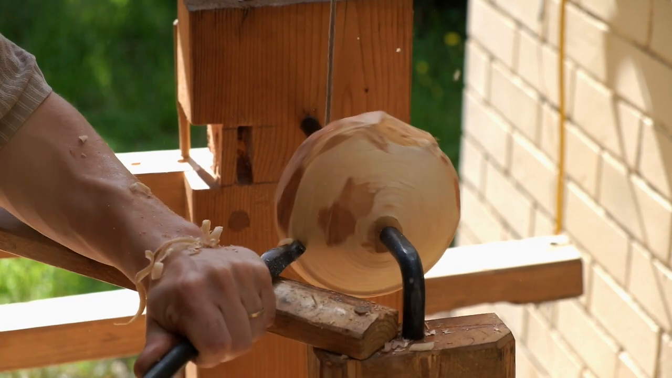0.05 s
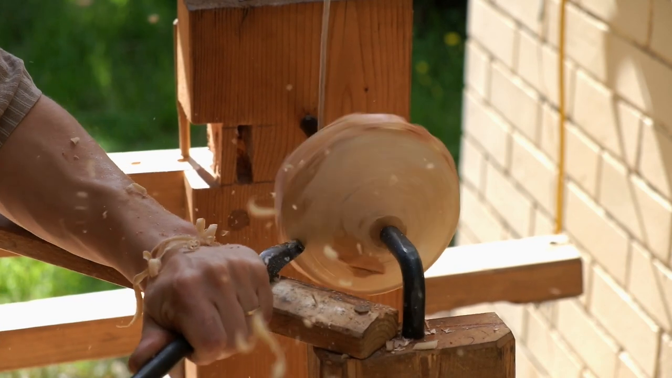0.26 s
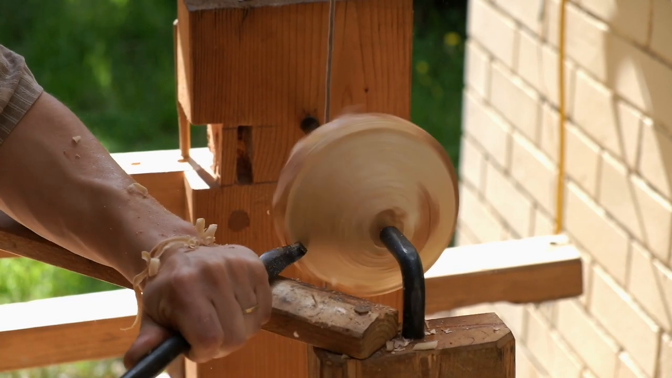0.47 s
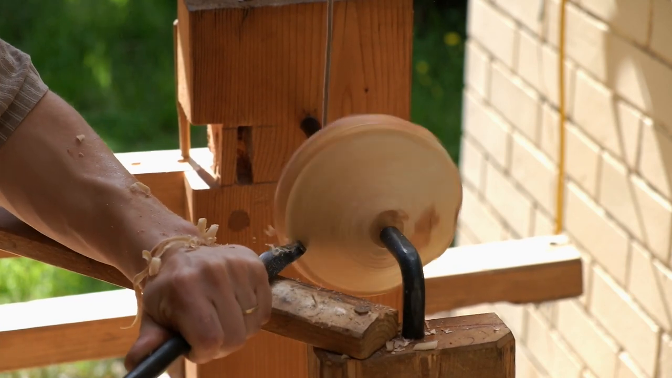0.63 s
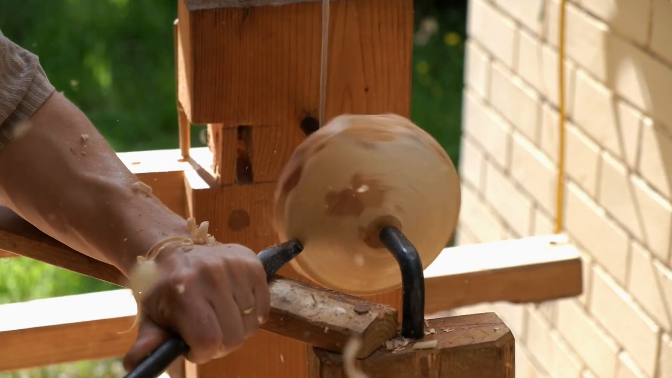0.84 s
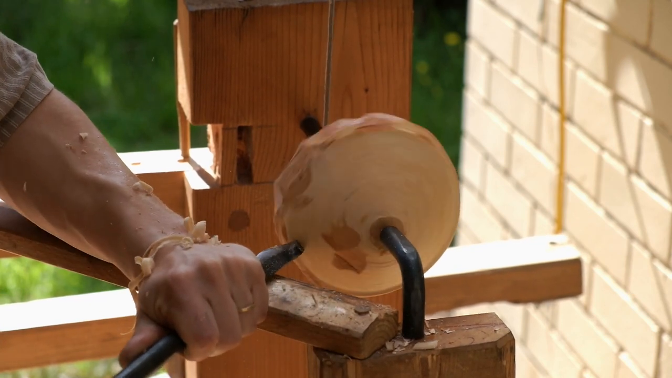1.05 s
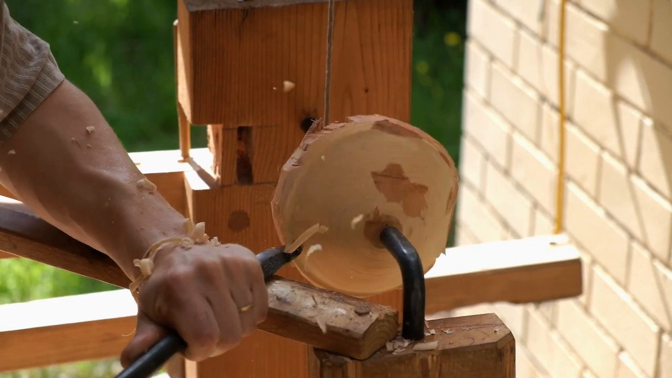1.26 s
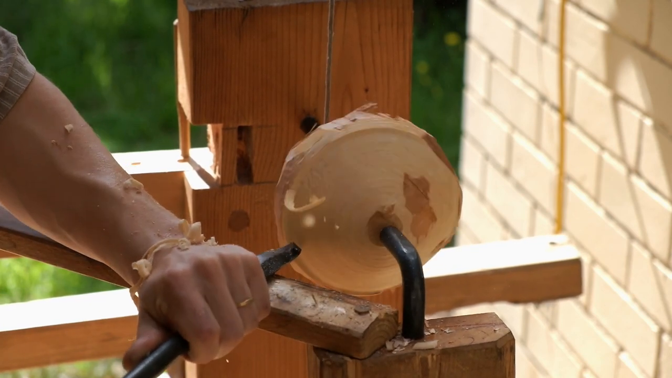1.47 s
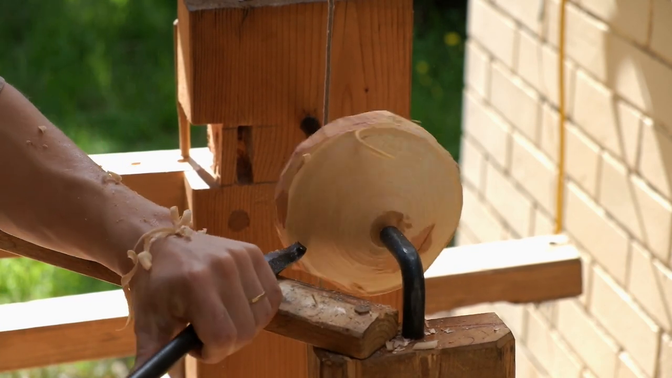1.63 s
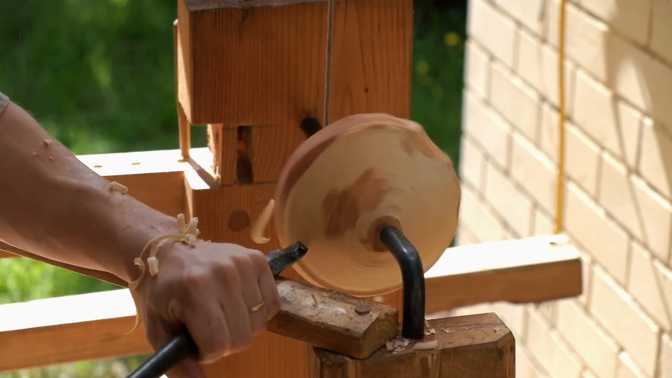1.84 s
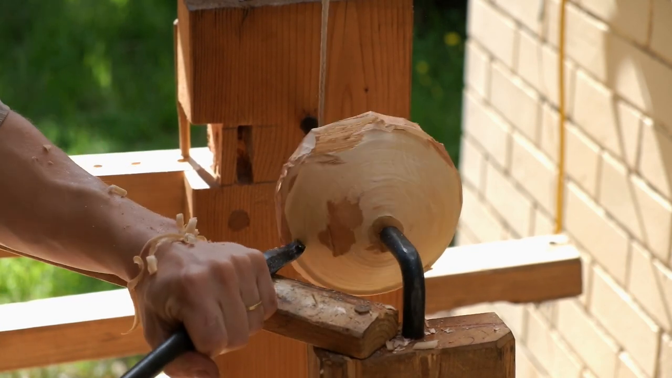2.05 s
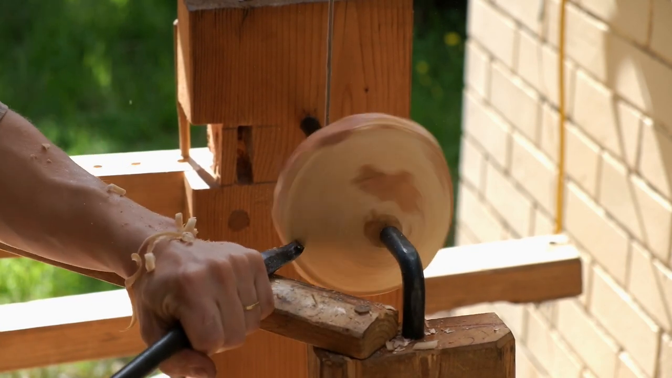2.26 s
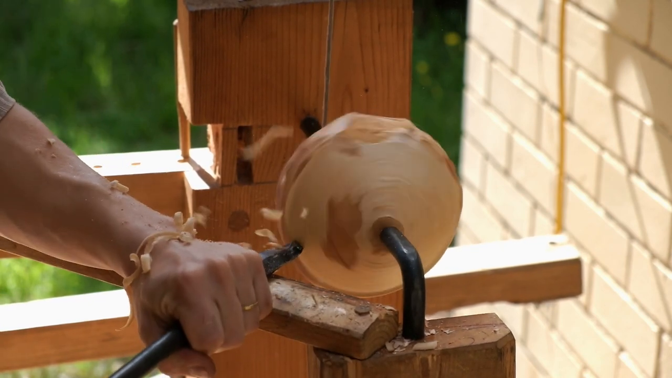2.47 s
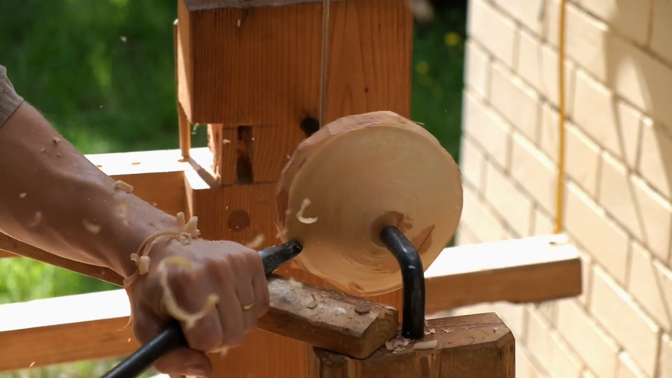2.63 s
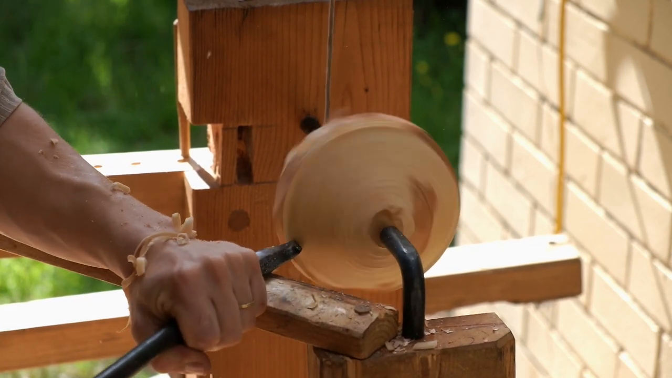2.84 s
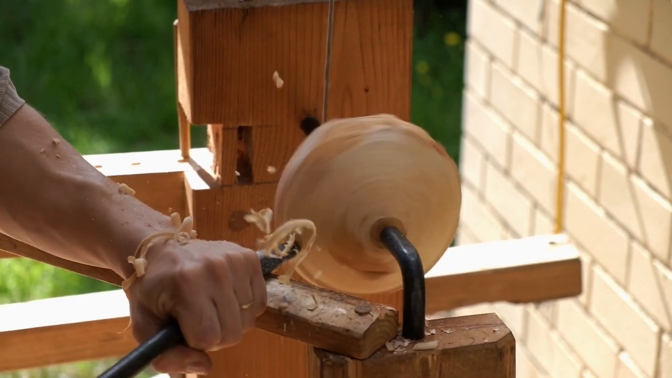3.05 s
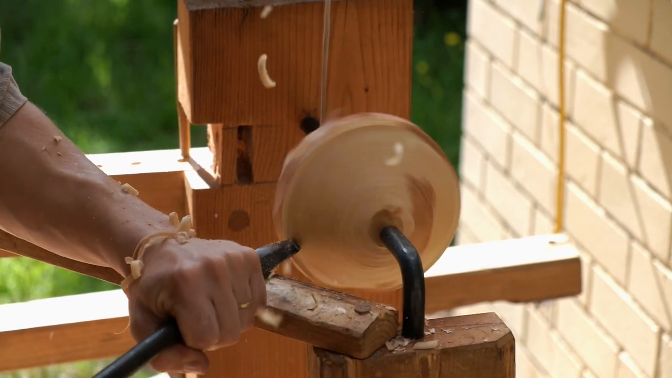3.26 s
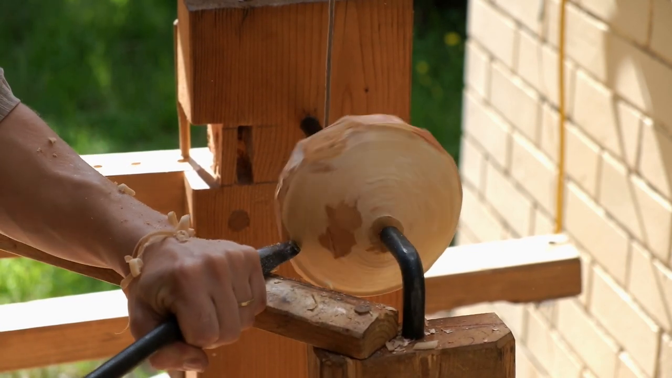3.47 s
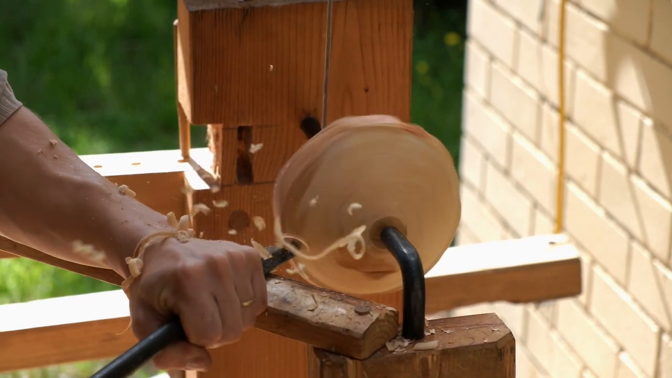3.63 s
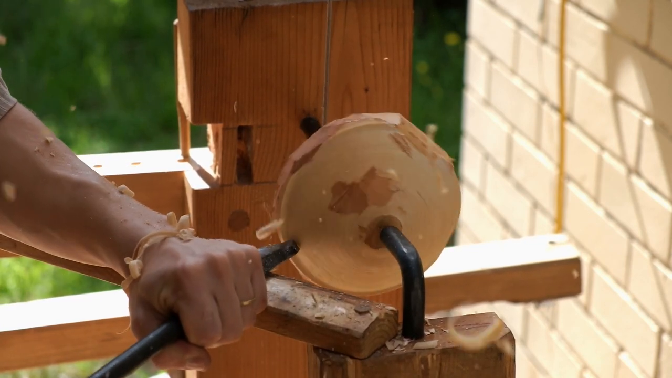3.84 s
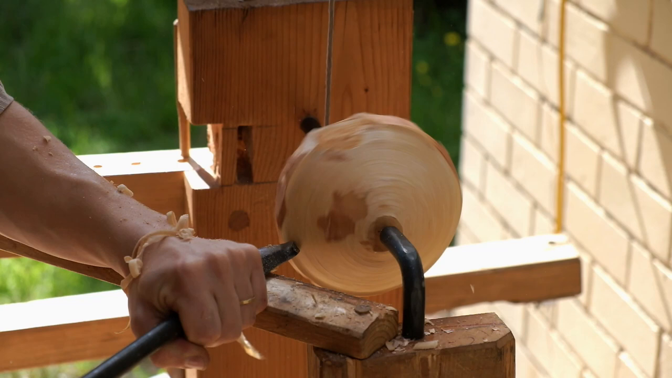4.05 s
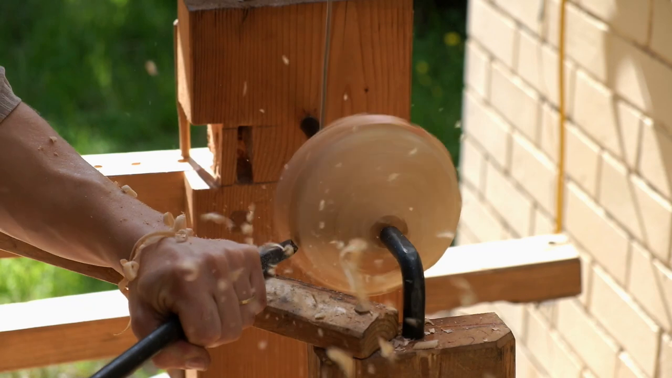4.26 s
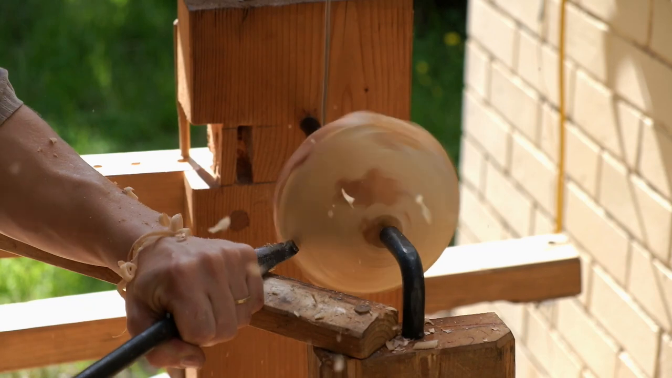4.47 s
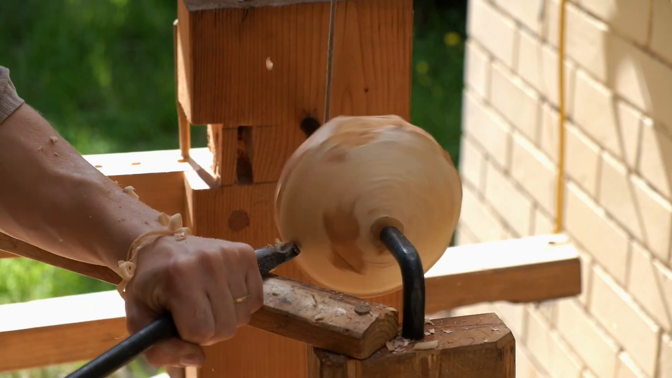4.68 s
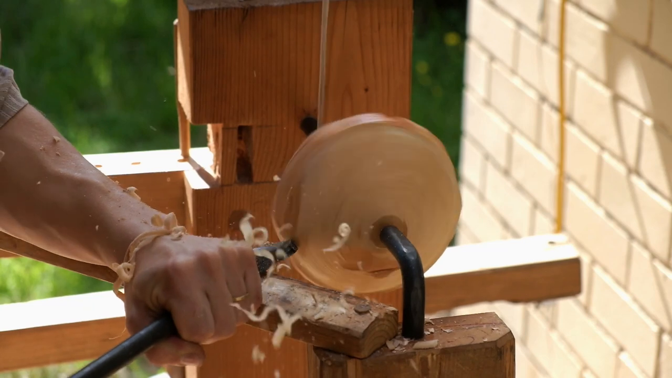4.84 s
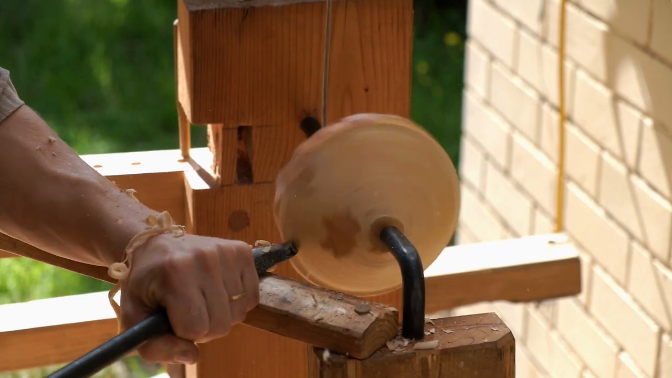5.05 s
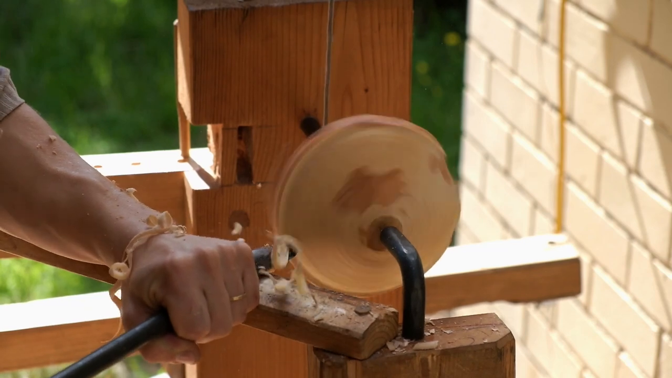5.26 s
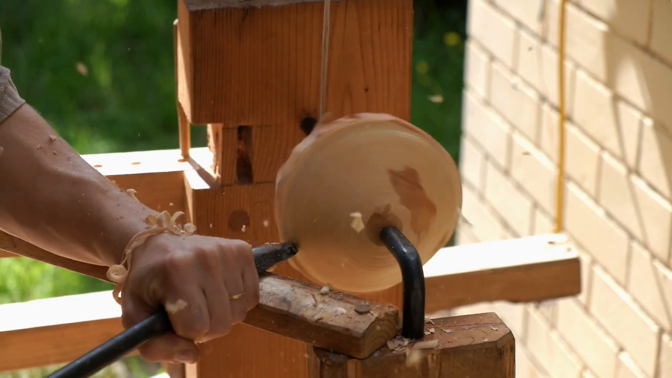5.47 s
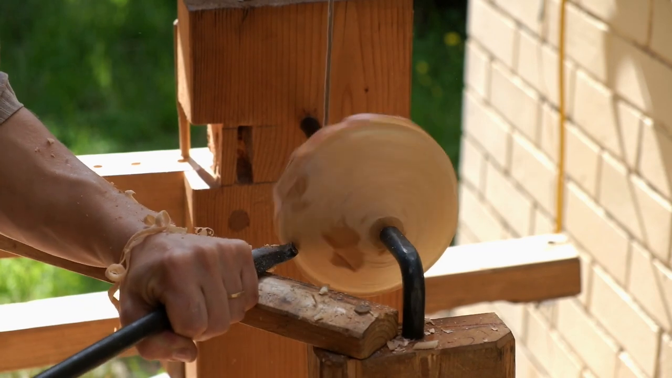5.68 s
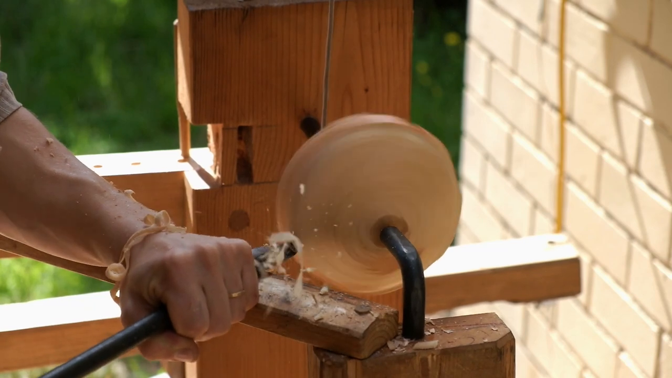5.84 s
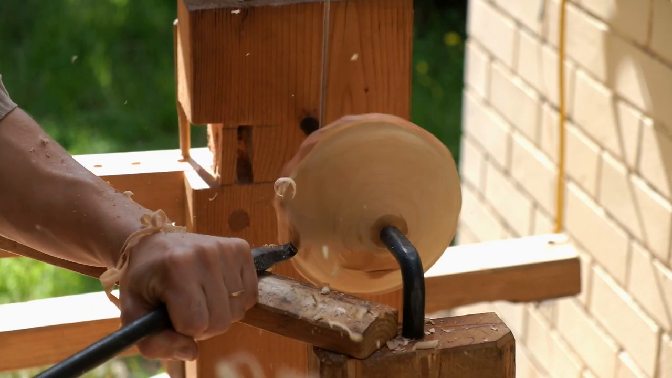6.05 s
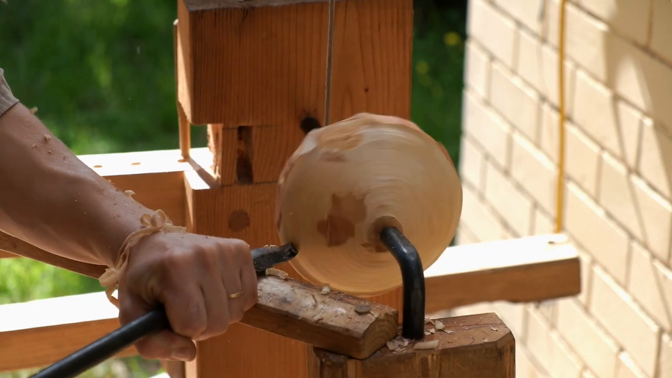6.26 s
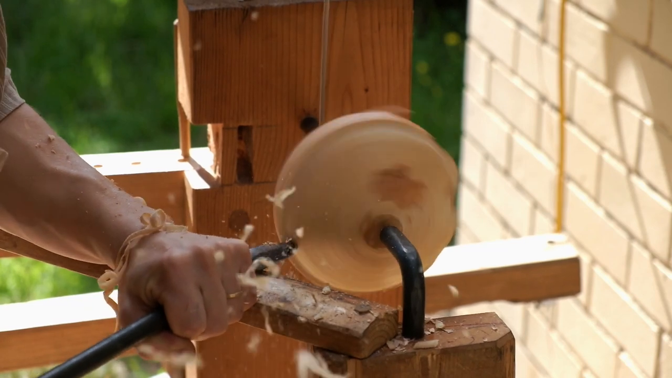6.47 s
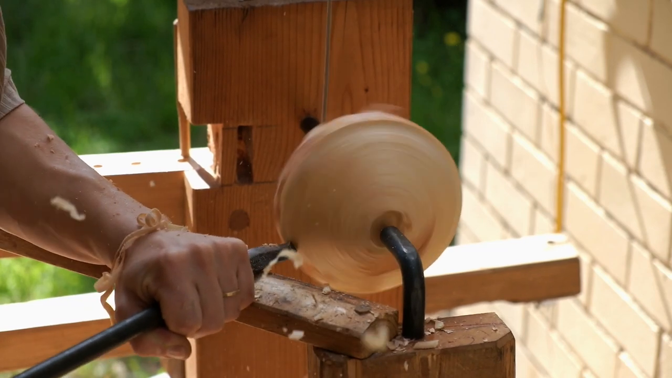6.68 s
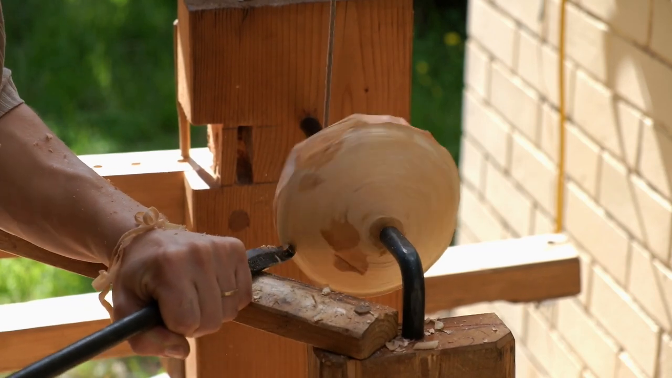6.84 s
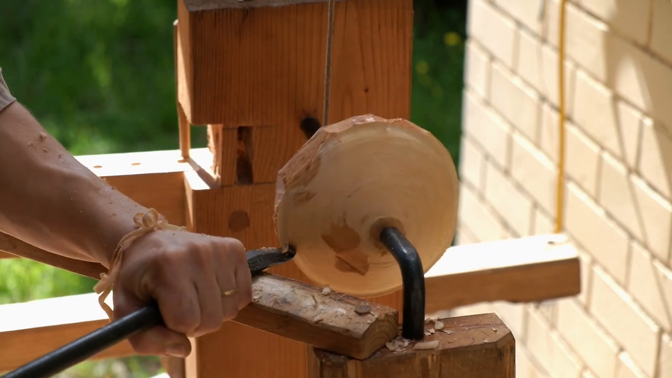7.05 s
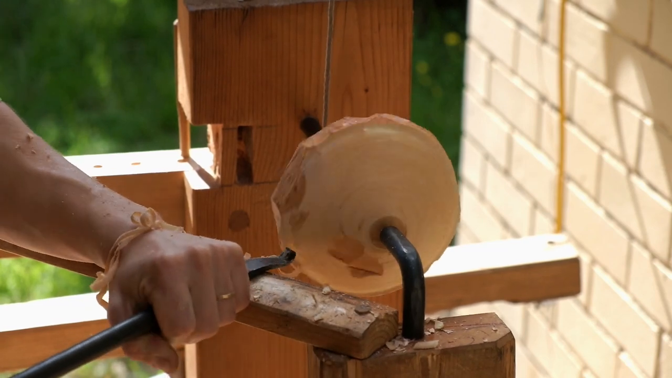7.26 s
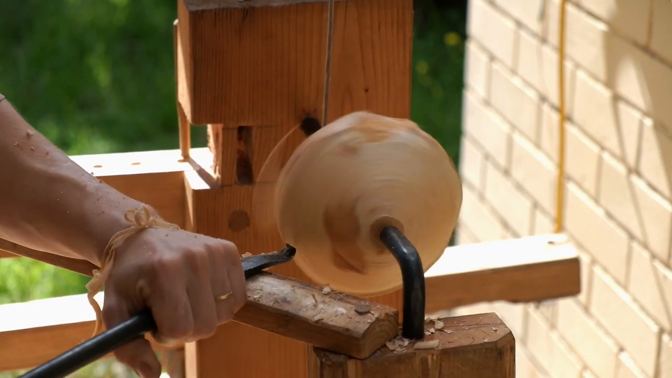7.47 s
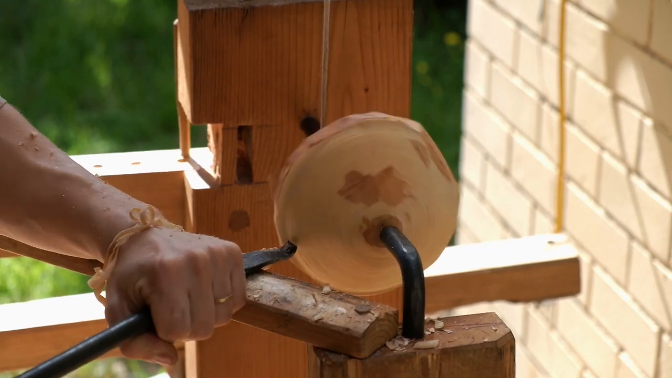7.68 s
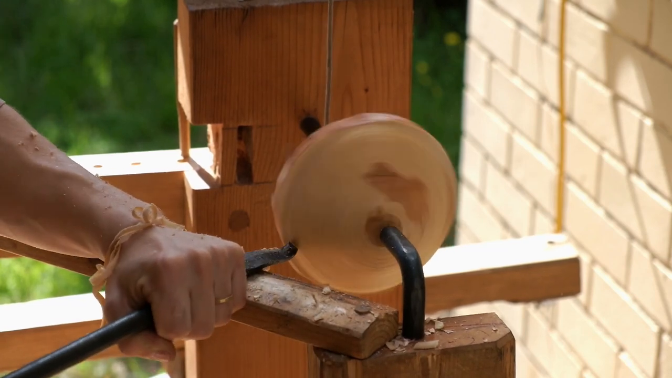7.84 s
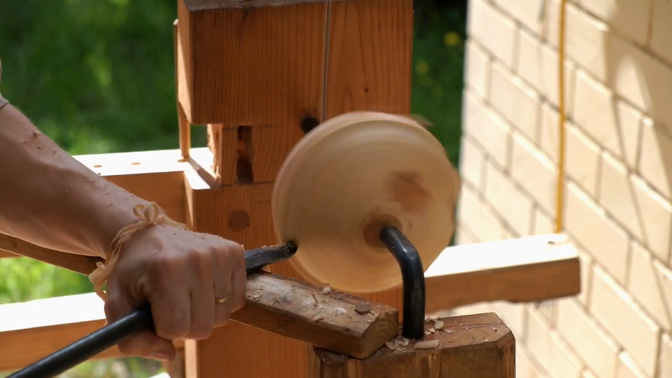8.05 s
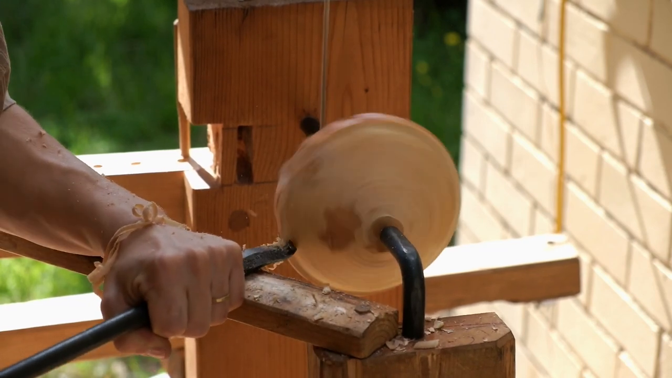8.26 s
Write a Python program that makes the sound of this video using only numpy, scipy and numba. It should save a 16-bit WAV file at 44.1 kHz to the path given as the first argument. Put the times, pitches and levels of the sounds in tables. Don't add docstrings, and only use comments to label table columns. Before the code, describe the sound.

Close, harsh bursts of a steel hook tearing spinning wood, with hollow knocks and timber thuds between, over faint traffic in a yard.

```python
import sys
import numpy as np
from scipy import signal
from scipy.io import wavfile
from scipy.ndimage import uniform_filter1d
from numba import njit

SR = 44100
rng = np.random.default_rng(int(sys.argv[2]) if len(sys.argv) > 2 else 0)


def volts_from_decibels(level):
    exponent = np.asarray(level, float) / 20
    return 10 ** exponent


def file_out(sig):
    cols = np.atleast_2d(sig).T
    lim = np.clip(cols, -1, 1)
    pcm = np.round(lim * 32767).astype(np.int16)
    wavfile.write(sys.argv[1], SR, pcm)


N = 366471

# start_s [s], level_db [dB peak],
# edge_hiss_db [dB], hold_s [s]
MORE_TOUCHES = [(0.005, -26.5, -10, 0.0087), (0.022, -23.5, -15, 0.011), (0.437, -38, -1, 0.0027),
                (0.491, -37, 0.5, .003), (0.718, -29, -14, .006), (0.922, -26, -6, .006), (1.056, -27, -9, .004),
                (1.073, -27, -5, .008), (1.106, -30, -12.5, 0.02), (1.165, -9.5, -23, 0.005),
                (2.465, -24.5, -16, 0.018), (2.79, -36.5, -2, .006), (3.216, -24.5, -12, .012),
                (3.242, -31.5, -6, 0.013), (3.481, -34, -2, 0.0069), (3.558, -26, -11, .018),
                (3.9465, -36, -7, .004), (4.228, -16, -19, .012), (0.382, -28, -6, .005),
                (4.9755, -17, -14, 0.013), (5.1058, -28, 0, 0.01), (5.897, -19, -3, 0.0077),
                (6.196, -33, -4, .008), (6.278, -37, -4, .012), (6.48, -15, -7.5, 0.015),
                (6.8376, -19, -10, 0.016), (6.892, -17, -7, .012), (8.116, -15.5, -11, 0.01),
                (8.1606, -16, -12, 0.0074), (8.2372, -21, -6, .01), (3.4, -39, -4, .004), (3.336, -37, -3, .004),
                (0.231, -8, -13, .008), (0.212, -14, -17, .006), (3.675, -8, -18, .008),
                (3.728, 1.5, -16, 0.009), (1.204, -0.5, -14, 0.017), (0.323, -23.5, -13, 0.0054),
                (0.76, -15, -7, .006), (3.761, -11.5, -17, .01)]
# full_contact_s [s], rise_s [s], hold_s [s], cut_db [dB], push_db [dB]
CONTACTS = [(0.152, 0.087, 0.12, -21.5, -23.5), (0.27, 0.011, 0.18, -45, -46),
            (0.645, 0.029, 0.19, -29.5, -48), (0.749, .005, 0.043, -20, -22.5),
            (0.882, 0.0046, 0.098, -51, -32.5), (1.149, 0.012, 0.012, -22, -44),
            (1.981, 0.0034, 0.41, -51, -41.5), (2.499, .003, 0.11, -19.5, -25.5),
            (2.942, .002, 0.073, -32, -27), (3.042, 0.0034, 0.047, -10.5, -23),
            (3.141, .01, 0.019, -23, -26), (3.312, 0.022, 0.2, -48.5, -44), (3.583, .002, 0.11, -25, -53),
            (3.646, .005, 0.1, -22, -29), (4.179, 0.014, 0.046, -33.5, -38),
            (4.252, 0.03, 0.072, -14.5, -21), (4.725, 0.0091, 0.19, -30, -32),
            (4.946, 0.045, 0.38, -46, -49), (5.282, 0.004, 0.11, -18.5, -28), (5.46, .01, 0.1, -42, -61),
            (5.807, .02, .045, -35, -45), (0.052, 0.009, 0.033, -47, -41), (2.062, .003, 0.022, -38, -59),
            (2.12, .005, 0.019, -43, -60), (3.617, .003, 0.04, -16, -38), (5.858, 0.003, 0.13, -21, -38.5),
            (6.413, 0.058, 0.12, -24, -30), (6.562, .01, 0.36, -41, -43.5), (8.076, 0.0018, 0.35, -43, -35)]
# start_s [s], level_db [dB peak], edge_hiss_db [dB]
SKIPS = [(0.099, -12.5, -15.5), (0.841, -13.5, -20), (0.8772, -14.5, -12), (0.952, -14.5, -16.5),
         (0.9875, -37.5, 0.5), (1.0155, -22, -12.5), (1.9837, -20.5, -11), (2.063, -19.5, -27),
         (2.169, -22.5, -12.5), (2.2163, -35, 3), (2.2524, -24, -18), (2.2872, -28, -4),
         (2.324, -22.5, -17), (2.351, -35, 0.5), (2.377, -25, -14), (2.4237, -24, -20.5), (2.6393, -9, -15),
         (2.987, -13.5, -18), (4.8467, -13, -10.5), (4.898, -14.5, -12.5), (4.993, -12, -15),
         (5.3742, -16.5, 0.5), (5.878, -30, -12.5), (6.557, -10, -14.5), (6.6104, -16.5, -15),
         (6.6532, -14.5, -7), (6.9014, -9.5, -11), (8.133, -16, -10), (8.207, -21, -13), (8.283, -15, -4)]
# start_s [s], level_db [dB peak], edge_hiss_db [dB], hold_s [s]
BITES = [(0.115, -10.5, -18.5, 0.006), (0.13, -5.5, -12, 0.007), (0.152, 1, -14, 0.035),
         (0.194, 0, -19, 0.0077), (0.256, -11, -11, 0.012), (0.739, -10, -8, 0.012),
         (0.77, -16.5, 0, 0.0048), (0.793, -14, -7, 0.011), (0.817, -11.5, -8, 0.0092),
         (1.1925, -0.5, -10.5, 0.007), (2.4947, 2, -20.5, 0.019), (2.537, -4.5, -14, 0.0054),
         (2.591, -3, -16, 0.015), (2.609, -2, -18, 0.009), (3.01, -12.5, -16.5, 0.014),
         (3.043, -1, -17, 0.02), (3.615, -13.5, -4, 0.017), (3.646, -0.5, -25.5, 0.024),
         (3.691, -3.5, -15.5, 0.009), (3.716, 2, -15, 0.006), (4.252, 0.5, -14, 0.005),
         (4.294, 1, -14.5, 0.0092), (4.7845, -14.5, -12, 0.006), (4.828, -10, -13.5, 0.011),
         (4.871, -11.5, -15, 0.016), (5.316, 1.5, -15.5, 0.02), (5.934, -1.5, -14.5, 0.017),
         (5.974, -9.5, -22, 0.0072), (6.0026, -0.5, -14.5, 0.008), (6.41, -8.5, -8, 0.027)]
# start_s [s], level_db [dB peak], rest_share_db [dB], hold_s [s]
JOLTS = [(0.175, -8, -2.5, 0.014), (0.462, -21.5, -21, 0.0053), (0.69, -10.5, -27, 0.021),
         (0.877, -9.5, -39, 0.0076), (0.953, -12.5, -15, 0.0036), (1.0127, -14, -16, 0.0033),
         (1.226, -15.5, -10, 0.0067), (1.498, -21.5, -27, 0.012), (2.171, -18, -16.5, 0.0053),
         (2.466, -18, -9, 0.0047), (2.502, -6, -2, 0.0036), (2.753, -19.5, -22, 0.011),
         (3.004, -13.5, -22.5, 0.0039), (3.045, -9, -7, 0.0047), (3.087, -14, -2, 0.013),
         (3.321, -18.5, -22, 0.0078), (3.656, -24, 8.5, 0.03), (3.751, -8.5, -8, 0.011),
         (4.288, -16, 0, 0.022), (4.993, -17.5, -14.5, 0.011), (5.188, -36, -1.5, 0.005),
         (5.282, -22, -8, 0.0056), (5.573, -20.5, -13.5, 0.007), (5.849, -22.5, -5.5, 0.0055),
         (5.938, -21, 2.5, 0.013), (6.292, -36.5, 4, 0.01), (6.47, -10.5, -20, 0.012),
         (6.653, -20, -17, 0.021), (7.7606, -27, -14, 0.004), (8.237, -9.5, -25, 0.005)]
# start_s [s], level_db [dB peak], rest_share_db [dB]
KNOCKS = [(0.263, -6, -13), (0.401, -20, -15), (0.747, -9, -14), (1.396, -32, -26), (1.652, -35, -11),
          (1.722, -29, -25), (1.981, -26, -26), (2.038, -22, -21), (2.563, -13.5, -7), (2.591, -9.5, -9),
          (3.156, -18, -1), (3.623, -27, -13), (4.248, -26.5, -15), (4.504, -22, -6.5),
          (4.572, -25.5, -10.5), (5.107, -29.5, 1), (6.124, -24, -16), (6.417, -10.5, -15.5),
          (6.594, -21, -27), (6.937, -29.5, -29), (8.082, -18, -25)]
# start_s [s], level_db [dB peak], edge_hiss_db [dB], hold_s [s]
GRAZES = [(0.403, -19.5, -9.5, 0.0041), (0.4636, -23.5, -10, .003), (0.542, -31, -5, .004),
          (0.5566, -19.5, -13.5, 0.015), (1.879, -22, -15, 0.0061), (2.9142, -35, -12, 0.0077),
          (3.313, -22.5, -13.5, 0.0057), (3.348, -21, -11, 0.011), (3.414, -22.5, -9.5, 0.0092),
          (3.973, -35.5, -3.5, 0.0091), (3.995, -28, -6.5, 0.028), (4.098, -33.5, 0.5, 0.019),
          (4.456, -20, -15, 0.0084), (4.502, -23, -10.5, 0.01), (4.568, -24, -8.5, 0.012),
          (4.66, -36.5, 1.5, 0.012), (5.0774, -31, 1.5, 0.018), (5.163, -24.5, -2.5, 0.012),
          (5.239, -24.5, -8.5, 0.024), (5.431, -15.5, -13, 0.0065), (5.569, -28.5, -1, 0.018),
          (5.651, -22, -6.5, 0.0054), (5.741, -29.5, -5.5, 0.016), (6.1208, -27.5, -12, .012),
          (6.211, -22, -12.5, 0.015), (6.294, -27.5, -6.5, 0.02), (6.685, -30, 0, 0.008),
          (6.752, -19.5, -4, 0.007), (6.812, -31.5, 8.5, 0.0081), (7.5212, -35, -24, 0.011)]
# start_s [s], level_db [dB peak], edge_hiss_db [dB]
NICKS = [(0.6394, -18, -33), (0.6744, -16, -14), (0.7002, -21.5, -15), (0.896, -17, -5.5), (0.888, -19, -6),
         (0.937, -26, -8), (1.0039, -25.5, -7), (1.189, -10, -9), (2.0144, -27, -12), (2.0334, -28, -12),
         (2.0824, -22, -18.5), (2.1271, -27.5, -17), (2.199, -29, -3.5), (2.2343, -23, -14),
         (2.2747, -39, -15), (2.446, -21.5, -16), (2.5644, -5.5, -6.5), (2.9423, -12.5, -16),
         (2.9594, -20.5, -24), (3.0746, -6.5, -26), (3.1097, -1.5, -13), (3.1364, -8, -9), (3.157, -11, -7),
         (3.5034, -23.5, -7), (3.5859, -9, -21), (3.7492, -2.5, -19), (4.1841, -14.5, -26),
         (4.265, -1, -11), (4.2783, -5, -11), (4.3174, -6.5, -16), (4.354, -8.5, -11), (4.7182, -20, -17),
         (4.7456, -15.5, -5), (4.7664, -11, -16), (4.8085, -13, -12.5), (4.8852, -12.5, -6.5),
         (4.9054, -14, -12), (4.9521, -17, -12), (5.0114, -17.5, -2), (5.0442, -31, -2),
         (5.1894, -22, -11.5), (5.303, -5, -9), (5.3482, -6.5, -17), (5.3862, -5, -9), (5.4858, -30, -4),
         (5.5397, -30, 3), (5.6363, -32, 0), (5.8521, -18, -14.5), (5.9144, -6, -6), (6.4394, -8, -9),
         (6.5094, -22, -2), (8.0772, -22.5, -13), (8.087, -22.5, -7), (8.1047, -29, -6), (8.1487, -27, -5),
         (8.1744, -23, -1), (8.1916, -19, -9), (8.259, -18.5, -6)]
LIFT_DB_S = 484


def level(x, db):
    return x * volts_from_decibels(db) / np.sqrt(np.mean(x ** 2))


def even(x, s):
    return x / np.sqrt(uniform_filter1d(x ** 2, int(s * SR)).clip(1e-9))


def dull(x, hz):
    return signal.sosfilt(signal.butter(3, hz, fs=SR, output="sos"), x)


@njit
def svf(x, g, k):
    y, b, l = np.empty(len(x)), 0., 0.
    for i in range(len(x)):
        v = (b + g[i] * (x[i] - l)) / (1 + g[i] * (g[i] + k))
        b, l, y[i] = 2 * v - b, l + 2 * g[i] * v, k * v
    return y


def band(x, hz, width, bend=1.):
    hz = min(1. * hz, .42 * SR)
    centre = np.tan(np.pi * hz / SR) * bend * np.ones(len(x))
    return svf(x + 1e-18, centre, max(1. * width, 5.) / hz)


def walk(rate):
    k = int(SR / rate)
    steps = np.repeat(rng.standard_normal(N // k + 1), k)
    return 1.2 * uniform_filter1d(steps, k)[:N]


def yard():
    # centre_hz [Hz], density_db [dB per Hz]
    spectrum = [(20, -12), (60, 7), (117, -3), (150, -35.5), (300, -8), (500, -20), (860, -1),
                (1200, -21.5), (3500, -25), (7300, -64), (15000, -63)]
    # pitch_hz [Hz], level_db [dB]
    motor = [
        (230, -62),
        (345, -56.5),
    ]
    hzs, dbs = np.transpose(spectrum)
    out, swell = 0, walk(5.6)
    for hz in 22 * 2 ** (np.arange(29) / 3):
        db = np.interp(np.log(hz), np.log(hzs), dbs) + 0.73 * swell + 0.97 * walk(5.9)
        noise = band(band(rng.standard_normal(N), hz, hz / 3), hz, hz / 3)
        out = out + volts_from_decibels(db) * level(noise, 10 * np.log10(hz))
    t = np.arange(N) / SR
    hum = sum(volts_from_decibels(db + 3.0 * walk(2.7)) * np.sin(2 * np.pi * hz * t) for hz, db in motor)
    return level(out, -44) + hum


def strokes(starts, dbs, rises_s, holds_s, fall_db_s):
    power = np.zeros(N)
    rise_db = 21.5
    for s, db, rise_s, hold_s in np.broadcast(starts, dbs, rises_s, holds_s):
        first = max(int((s - rise_s) * SR), 0)
        last = min(int((s + hold_s + 80 / fall_db_s) * SR), N)
        i = np.arange(first, last)
        t = i / SR - s
        ramp_db = rise_db * np.minimum(t / rise_s, 0)
        drop_db = fall_db_s * np.maximum(t - hold_s, 0)
        power[i] += volts_from_decibels(db + ramp_db - drop_db) ** 2
    return power


def patch_of(*tables):
    starts = np.sort([row[0] for table in tables for row in table])
    return np.searchsorted(starts, np.arange(N) / SR)


def fibres(rate, spread_db, hiss):
    strength = volts_from_decibels(spread_db * rng.exponential(size=N))
    snaps = (rng.random(N) < rate / SR) * strength * rng.choice([-1, 1], size=N)
    return level(level(snaps, 0) + hiss * rng.standard_normal(N), 0)


def chips():
    count = int(120 * N / SR)
    when_s, size_db = rng.random(count) * N / SR, 1.5 * rng.standard_normal(count)
    train = strokes(when_s, size_db, 0.0059, 0.002, 3501)
    power = train / train.mean() + 1
    return power / uniform_filter1d(power, int(0.052 * SR))


def ring(source, force, modes, patch, vary_db, detune, skirt_db, skirt_hz):
    chance = rng.standard_normal((patch.max() + 1, 2, len(modes)))
    load, bend = volts_from_decibels(vary_db * chance[:, 0]), 1 + detune * chance[:, 1]
    skirt_width = 1.51 * skirt_hz

    def body(x):
        out = volts_from_decibels(skirt_db) * band(band(x, skirt_hz, skirt_width), skirt_hz, skirt_width)
        for k, (hz, width, db) in enumerate(modes):
            out = out + (-1) ** k * volts_from_decibels(db) * band(x * load[patch, k], hz, width, bend[patch, k])
        return out

    return body(source * force) / np.std(body(source))


def touches(rows, edge, base_db, rise_s, hold_s, fall_db_s, snap_db):
    s, peak_db, hiss_db = np.transpose(rows)[:3]
    db = base_db + peak_db + edge * hiss_db
    return strokes(s, db, rise_s, hold_s, fall_db_s) + strokes(s, db + snap_db, 0.0018, 0.0005, 2605)


def cut(edge, grain):
    s, rise_s, hold_s, cut_db, _ = np.transpose(CONTACTS)
    bite_s, bite_hold_s = np.transpose(BITES)[[0, 3]]
    light = GRAZES + MORE_TOUCHES
    light_hold_s = np.transpose(light)[3]
    slip_s, slip_db = 0.013, -2
    slip = volts_from_decibels(slip_db * strokes(bite_s - slip_s, 0, .006, slip_s - .002, 9000).clip(0, 1)) ** 2
    power = grain * slip * strokes(s, cut_db - 12.5 * edge, rise_s, hold_s, LIFT_DB_S)
    power = power + touches(BITES, edge, -8, 0.0025, bite_hold_s, 1796, snap_db=1.5)
    power = power + touches(SKIPS, edge, -11, 0.0026, 0.01, 2200.5, snap_db=6)
    power = power + touches(light, edge, -11.5, 0.003, light_hold_s, 2596, snap_db=5)
    return power + touches(NICKS, edge, -11.5, 0.004, 0.0042, 1800, snap_db=3)


def tool():
    # pitch_hz [Hz], width_hz [Hz], level_db [dB]
    shank_modes = [(1645, 120, -8.5), (1950, 320, -9.5), (2223, 91, -4.5), (2590, 95, 3.5), (3050, 25, -18),
                   (3378, 180, 4), (3878, 80, -1), (4692, 170, -1.5), (5380, 114, 0), (5980, 66, -16)]
    # pitch_hz [Hz], width_hz [Hz], level_db [dB]
    hook_modes = [(5810, 570, 0), (7066, 205, 7), (9030, 560, -3.5), (10100, 310, -14), (10720, 350, -8),
                  (13400, 790, -15.5)]
    patch, grain = patch_of(CONTACTS, BITES, SKIPS, GRAZES, MORE_TOUCHES, NICKS), chips()
    tear = even(fibres(rate=2500, spread_db=3.5, hiss=0.63), 0.0054) * volts_from_decibels(1.8 * walk(160))
    shank = ring(tear, np.sqrt(cut(0, grain)), shank_modes, patch,
                 vary_db=1.44, detune=.005, skirt_db=-8, skirt_hz=2875)
    hook = ring(tear, np.sqrt(cut(0.86, grain)), hook_modes, patch,
                vary_db=2.5, detune=0.021, skirt_db=-8.0, skirt_hz=9080)
    return volts_from_decibels(-3.0) * shank + hook


def shove(rest):
    s, rise_s, hold_s, _, push_db = np.transpose(CONTACTS)
    knock_hold_s = 0.0027
    jolts = JOLTS + [(*row, knock_hold_s) for row in KNOCKS]
    jolt_s, peak_db, share_db, jolt_hold_s = np.transpose(jolts)
    steady = strokes(s, push_db, rise_s, hold_s, LIFT_DB_S * 0.29)
    steady = steady + volts_from_decibels(-11.5) ** 2 * cut(edge=0, grain=0.7)
    steady = steady + volts_from_decibels(-50.5) ** 2
    jolt_db = -9 + peak_db + rest * (share_db + 8.5)
    jolt = strokes(jolt_s, jolt_db, .002, jolt_hold_s, 500.5)
    blow = strokes(jolt_s, jolt_db + 7, 0.00057, 0.0021, 4002.5)
    return volts_from_decibels(-5 * rest) ** 2 * steady + jolt + blow


def wood():
    # pitch_hz [Hz], width_hz [Hz], level_db [dB]
    bowl_modes = [(324.4, 54, -8.5), (393.3, 40.4, 3), (483, 51, 4.5), (541.7, 63.4, 5.5),
                  (1142, 120, -11.5)]
    # pitch_hz [Hz], width_hz [Hz], level_db [dB]
    rest_modes = [(877, 72, 13), (911, 24, 13), (1228, 58, -2.5)]
    patch = patch_of(CONTACTS, JOLTS, KNOCKS, BITES)
    push = even(fibres(rate=500, spread_db=3.0, hiss=0.67), 0.0079) * volts_from_decibels(1.5 * walk(70))
    bowl = ring(push, np.sqrt(shove(0)), bowl_modes, patch,
                vary_db=2, detune=0.038, skirt_db=-9, skirt_hz=572)
    rest = ring(push, np.sqrt(shove(0.93)), rest_modes, patch,
                vary_db=2, detune=0.013, skirt_db=-4.0, skirt_hz=1464)
    return dull(volts_from_decibels(-4.5) * bowl + volts_from_decibels(-1.26) * rest, 2270)


def frame():
    smooth_s = 0.032
    load = np.sqrt(uniform_filter1d(shove(0), int(smooth_s * SR)).clip(0)) ** 0.63
    shake = rng.standard_normal(N) * volts_from_decibels(3.0 * walk(25))
    body = band(shake, 65, 68) + volts_from_decibels(-4.0) * band(shake, 140, 89) + volts_from_decibels(-6.5) * band(shake, 220, 120)
    return level(dull(body, 448), 0) * (volts_from_decibels(-23) * load + volts_from_decibels(-63))


def pings():
    loose_rings = [(0.263, -19, 525, 0.096), (0.564, -25, 2885, 0.082), (1.516, -24, 905, .13),
                   (1.5175, -29, 1480, 0.033), (2.991, -16.5, 485, .07), (3.051, -12, 525, .07),
                   (3.353, -37, 3210, 0.076), (3.419, -35, 2910, 0.074), (3.652, -5.5, 885, .13),
                   (3.689, -18, 866, .11), (3.752, -10, 1590, .08), (3.756, -14, 545, 0.1),
                   (3.779, -28.5, 1305, 0.2), (4.296, -9, 875, .14), (4.421, -31, 872, 0.25),
                   (5.945, -22.5, 950, 0.087), (7.759, -29, 862, .16), (7.76, -28, 515, .065),
                   (7.821, -34, 882, 0.037)]
    out, t = np.zeros(N + 8192), np.arange(8192) / SR
    for s, db, hz, t60 in loose_rings:
        i = int(s * SR)
        onset = 1 - np.exp(-t / 0.0022)
        out[i:i + len(t)] += volts_from_decibels(db - 60 * t / t60) * np.sin(2 * np.pi * hz * t) * onset
    return out[:N]


def thumps():
    timber_thumps = [(0.878, -18, 397), (1.218, -26, 206), (1.26, -37, 128), (1.394, -31.5, 346),
                     (1.497, -20.5, 340), (1.697, -34, 605), (2.016, -21.5, 410), (2.747, -24, 383),
                     (3.175, -26, 200), (3.313, -20, 418), (4.569, -32.5, 228), (5.57, -35, 290),
                     (5.85, -48, 234), (6.121, -28, 288), (6.902, -41, 347), (7.76, -37, 226),
                     (8.156, -27, 310), (8.238, -34, 330), (0.936, -18.5, 425), (1.526, -30, 450),
                     (2.04, -36, 410), (4.789, -34, 252), (4.85, -24, 300), (4.9, -25, 150),
                     (5.0, -31, 250)]
    out, t = np.zeros(N + 8192), np.arange(8192) / SR
    t60_s = 0.087
    shape = (1 - np.exp(-t / 0.0026)) * volts_from_decibels(-60 * t / t60_s)
    for s, db, hz in timber_thumps:
        pair = np.sin(2 * np.pi * hz * t) + 0.21 * np.sin(2 * np.pi * 2.3 * hz * t)
        i = int(s * SR)
        out[i:i + len(t)] += volts_from_decibels(db) * pair * shape
    return out[:N]


def ticks():
    crackles = [(1.3994, -36, 3460), (1.7265, -30.5, 700), (1.243, -25, 200), (7.55, -31.5, 2950),
                (1.6266, -37, 3260), (1.695, -37, 1850), (1.726, -45, 2160), (1.8023, -37, 3240),
                (2.817, -24.5, 3300), (5.65, -23, 1500), (5.7176, -28.5, 2320), (7.2894, -47, 2780),
                (7.3246, -42, 1950), (7.519, -34, 2840), (7.535, -30.5, 3090), (7.614, -38, 2190),
                (7.656, -31, 3600), (7.7597, -36, 1500), (7.76, -35, 3600), (7.838, -37.5, 3180),
                (1.5153, -32, 1300), (1.675, -41, 1700), (2.2526, -17, 2760), (4.8295, -15, 2980),
                (4.785, -19, 2700), (1.0167, -20, 2980), (2.768, -30, 5450), (2.778, -36, 4800),
                (4.558, -31, 6500), (4.252, -7, 3400), (4.487, -28, 6500)]
    out, t = np.zeros(N), np.arange(2048) / SR
    for s, db, hz in crackles:
        puff = rng.standard_normal(len(t)) * (np.exp(-t / 0.008) + 1.5 * np.exp(-t / .0008))
        crack = band(band(puff, hz, 0.48 * hz), hz, 1.0 * hz)
        crack = crack + volts_from_decibels(-24.5) * band(band(puff, hz, 3 * hz), hz, 3 * hz)
        i = int(s * SR)
        out[i:i + len(t)] += volts_from_decibels(db) * crack / np.abs(crack).max()
    return out


def wall(x, slap_s, slap_db, tail_db, t60):
    t = np.arange(SR // 2) / SR
    fade = np.exp(-np.log(1000) * t / t60) * (t > slap_s)
    tail = band(rng.standard_normal(len(t)), 1200, 4000) * fade
    echo = volts_from_decibels(tail_db) * tail / np.linalg.norm(tail)
    echo[0], echo[int(slap_s * SR)] = 1, volts_from_decibels(slap_db)
    return signal.fftconvolve(x, echo)[:N]


def scene():
    lathe = tool() + wood() + frame() + pings() + thumps() + ticks()
    hiss = level(band(rng.standard_normal(N), 6000, 14000), -67.5)
    return (wall(lathe, slap_s=.004, slap_db=-17.0, tail_db=-18.0, t60=0.39) + yard() + hiss)[None]


def top_cut(x):
    return signal.sosfilt(signal.butter(12, 16820, fs=SR, output="sos"), x)


def record(dry):
    top = 0.61
    flattened = dry / (1 + np.abs(dry / top) ** 4) ** 0.25
    low_pass = signal.ellip(8, .2, 50, 16000, fs=SR, output="sos")
    return top_cut(signal.sosfilt(low_pass, flattened))


dry = scene()
out = record(dry)
file_out(out)
```